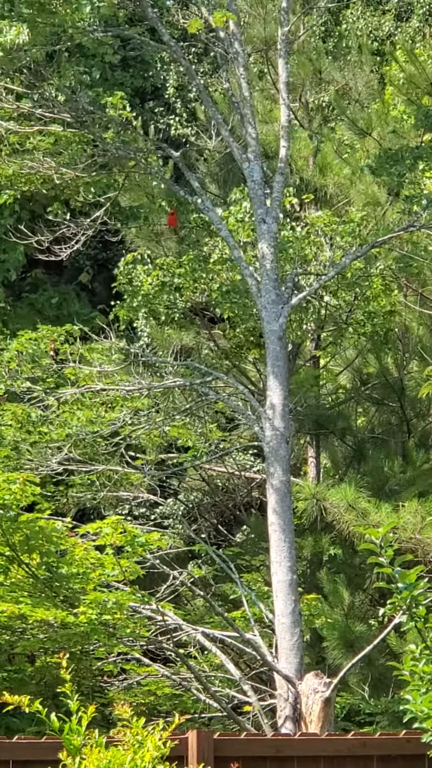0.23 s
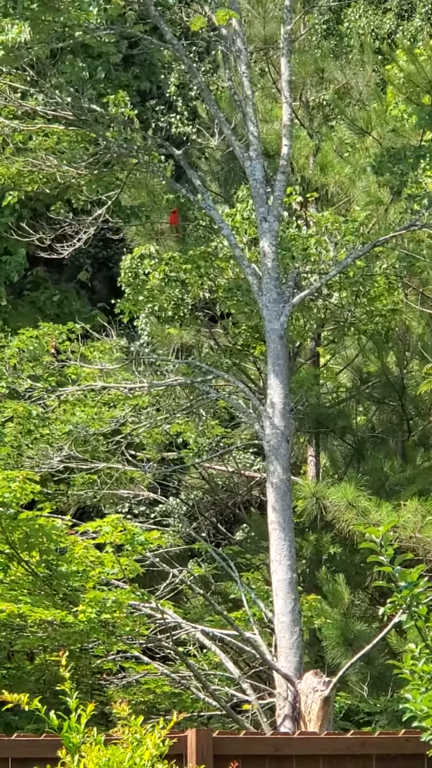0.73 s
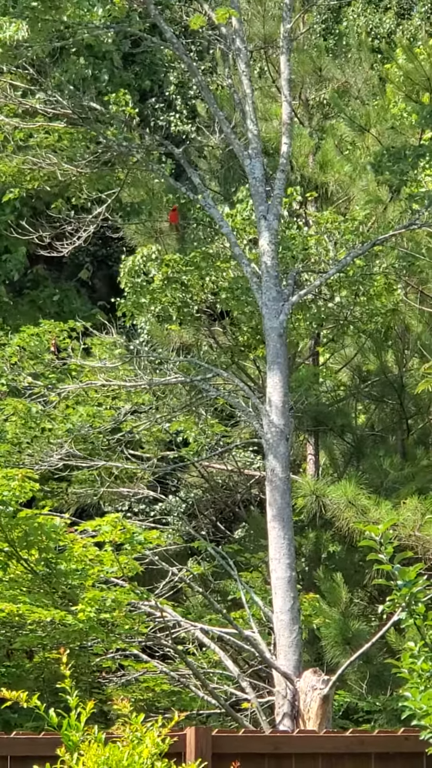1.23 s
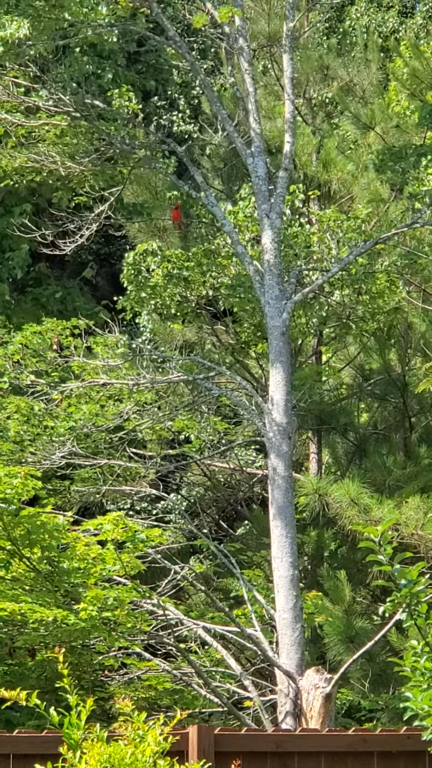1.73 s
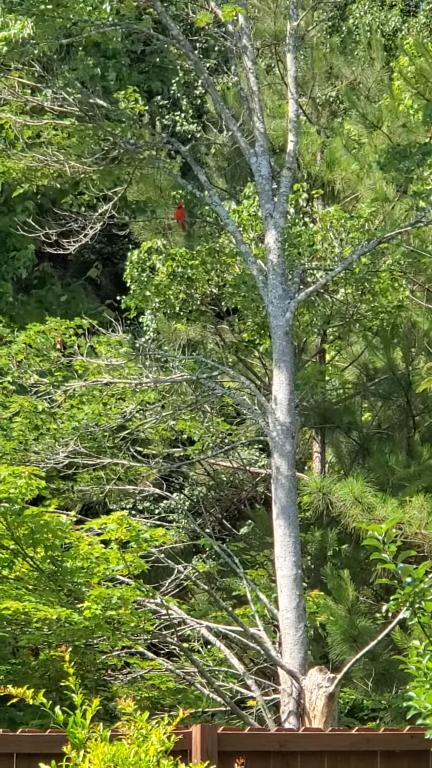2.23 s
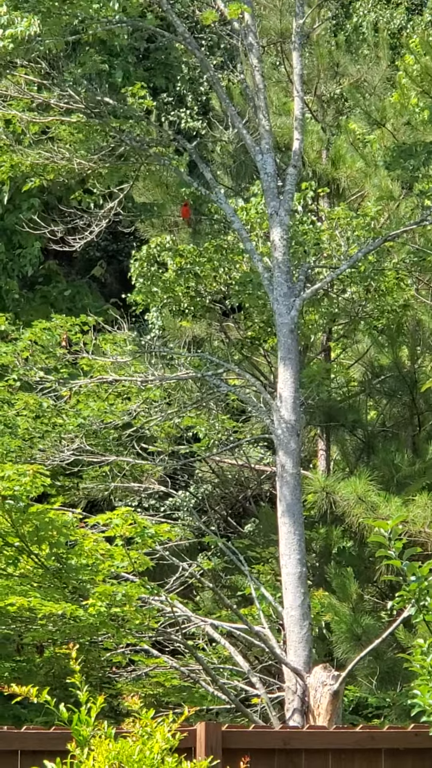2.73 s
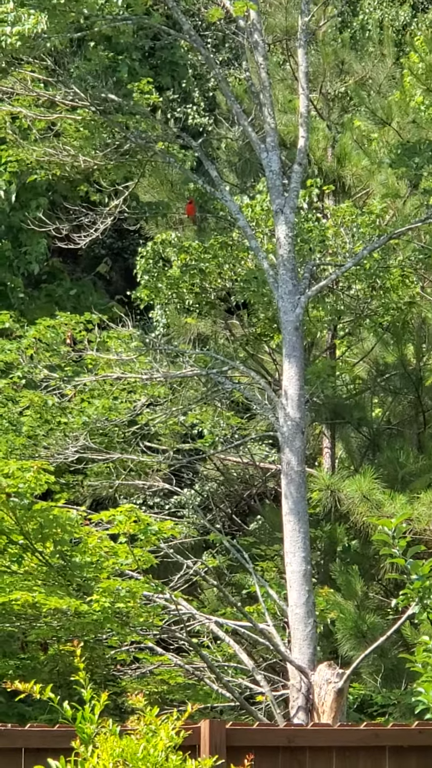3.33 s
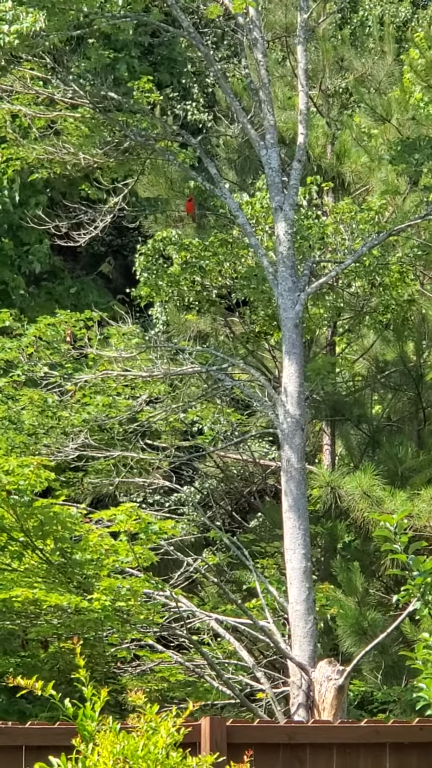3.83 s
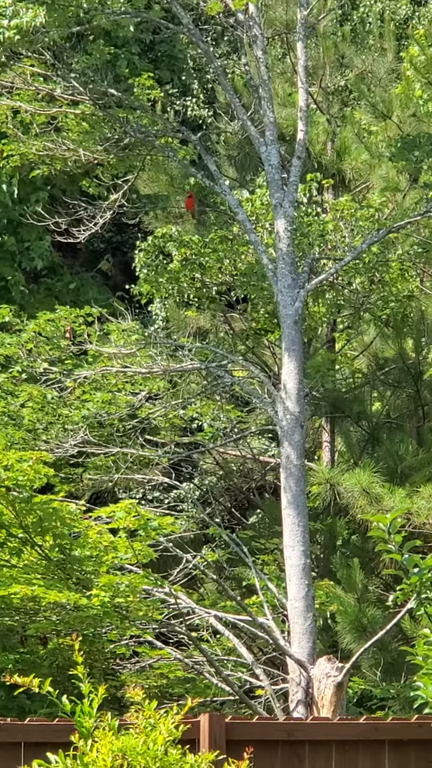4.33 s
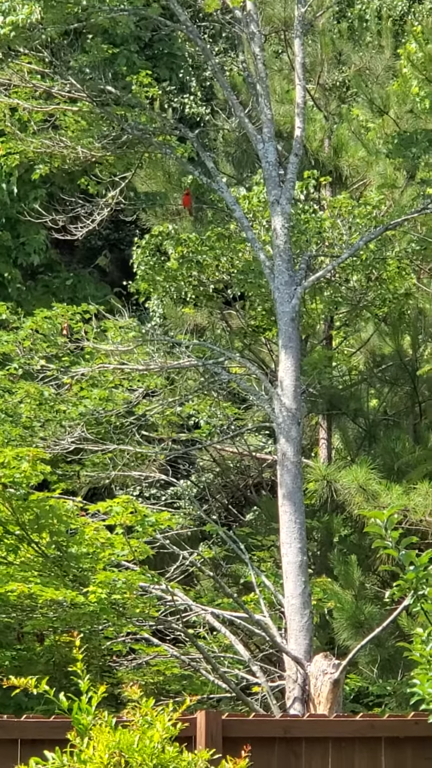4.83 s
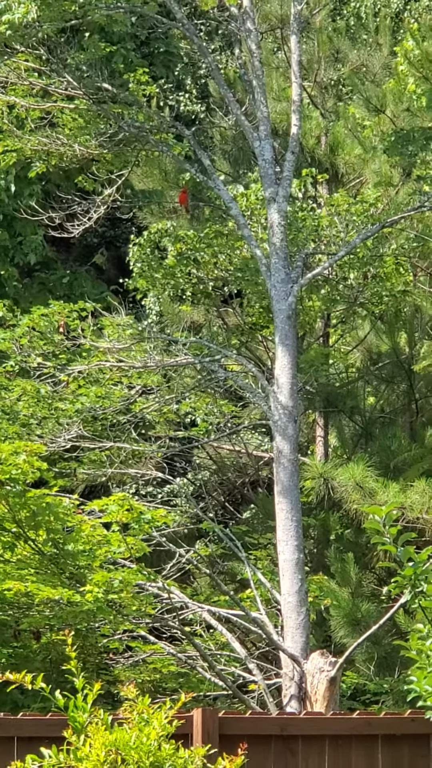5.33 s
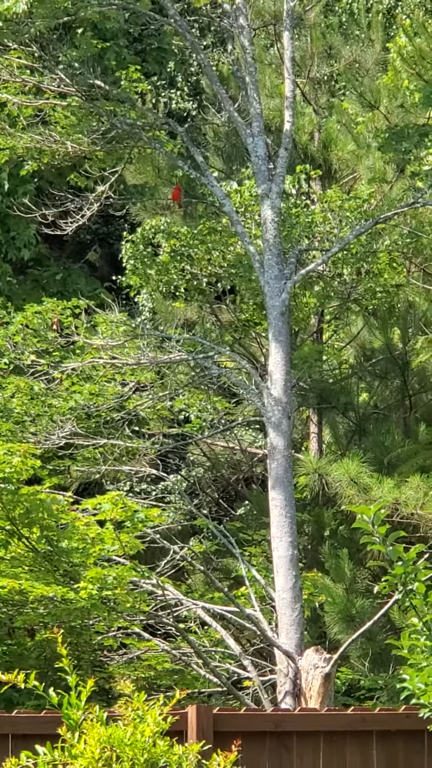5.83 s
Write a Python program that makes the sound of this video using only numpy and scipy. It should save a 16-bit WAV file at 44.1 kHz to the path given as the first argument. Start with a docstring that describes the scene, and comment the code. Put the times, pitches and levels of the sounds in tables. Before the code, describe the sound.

A quiet yard beside woods, heard through a phone: soft wide air and leaf hiss, a low wavering rumble that swells and dips, and a very faint distant machine hum with a thin fading whine. A cardinal starts immediately with a weak short note, then a longer falling whistle at 0.5 s and stronger ones at 0.9, 1.25 and 1.55 s. Each is a pure, liquid slur plunging from about 8 kHz, briefly easing, then sliding down to about 2 kHz. They come about every quarter second, loudest and brightest near 2.9 s. From 3.2 s they are clipped shorter, about five or six per second, the last softer at 4.3 s and over by 4.45 s. Close echoes and a short leafy tail surround every note, the bird slightly left. Rumble and hiss remain, with one tiny, faint falling chip at 5.5 s, until about 6 s.

```python
"""A low wavering rumble, a faint machine hum and open-air hiss come first; at once a cardinal sings over them.
Its slurred whistles fall from roughly 8 to 2 kHz and crowd together; one faint chip follows the song.
Each note is a swept sine: plunge to a shelf, drop as one side of the syrinx hands over to the other, slur down.
Noise-burst responses scatter the bird into near echoes, a leafy tail and a wall echo.
Beds: shaped noise for air, a wandering sine for the rumble, unsteady sines for the hum."""
import sys
import numpy as np
from scipy import signal
from scipy.fft import rfft, irfft, next_fast_len
from scipy.io import wavfile
from scipy.ndimage import uniform_filter1d

SR = 44100
rng = np.random.default_rng(int(sys.argv[2]) if len(sys.argv) > 2 else 0)


def bounce(signal):
    """Save signal as a 16-bit WAV file at the path given by the first command-line argument."""
    frames = np.transpose(np.atleast_2d(signal))
    limited = np.clip(frames, -1, 1)
    pcm = np.round(limited * 32767).astype(np.int16)
    wavfile.write(sys.argv[1], SR, pcm)


N = 267907
TIME = np.arange(N) / SR  # s


def undb(db):
    """Decibels to amplitude gain."""
    return 10 ** (np.asarray(db) / 20)


def unit(x):
    """Scale to rms 1."""
    return x / np.sqrt(np.mean(x ** 2))


def curve(table):
    """Second column of a table over TIME, joined by straight lines."""
    knots_s, values = np.transpose(table)
    return np.interp(TIME, knots_s, values)


def gain_at(points, hz):
    """Gain of a (frequency [Hz], level [dB]) spectrum, linear in dB over log frequency."""
    knots_hz, db = np.transpose(points)
    return undb(np.interp(np.log(np.maximum(hz, 1)), np.log(knots_hz), db))


def colour(x, points):
    """Zero-phase FFT filter by a (frequency [Hz], level [dB]) spectrum."""
    length = x.shape[-1]
    size = next_fast_len(length)
    gain = gain_at(points, np.fft.rfftfreq(size, 1 / SR))
    return irfft(rfft(x, size) * gain, size)[..., :length]


def walk(rate_hz):
    """Random levels held 1 / rate_hz, smoothed twice over the same time; rms 1."""
    hold = int(SR / rate_hz)
    held = np.repeat(rng.standard_normal(N // hold + 1), hold)
    smooth = uniform_filter1d(uniform_filter1d(held, hold), hold)
    return unit(smooth[:N])


def sine(hz):
    """Sine of rms 1 following a pitch curve: phase is the running sum of frequency."""
    return np.sqrt(2) * np.sin(2 * np.pi * np.cumsum(hz) / SR)


def bed(points, side_db):
    """Coloured stereo noise, rms 1; side_db sets left-right difference against the common part."""
    mid, side = colour(rng.standard_normal((2, N)), points)
    return unit(mid + undb(side_db) * side * np.array([[1], [-1]]))


# Open-air level before the band trims: (time [s], level [dB])
AIR_LEVEL = [(0, -54), (1.2, -52), (4.3, -51.5), (4.7, -53), (6.07, -53.5)]
# Tree hiss level: (time [s], level [dB])
HISS_LEVEL = [(0, -66.5), (2.5, -58.5), (5.2, -67.5), (6.07, -65.5)]
# Relative spectra of roar, middle band and hiss: (frequency [Hz], level [dB])
LOW_COLOUR = [(15, -35), (25, -43), (37, 1), (52, 0.5), (80, 5), (115, 2.5), (135, -8.5), (185, -5.5),
              (220, -21), (350, -63)]
MID_COLOUR = [(120, -3.5), (220, 0.5), (400, -1), (700, 0), (1100, -5.5), (1600, -16.5), (2500, -39.5),
              (5000, -48)]
HISS_COLOUR = [(800, -3.5), (2000, -2), (3200, -2.5), (5200, -3.5), (6600, -6.5), (8500, -14.5),
               (11000, -19), (15000, -23)]


def air(low_trim_db=2, mid_trim_db=-6, hiss_flicker_db=0.93):
    """Noise in three bands: distant roar nearly alike on both sides, middle, wide tree hiss."""
    air_db = curve(AIR_LEVEL)
    hiss_db = curve(HISS_LEVEL) + hiss_flicker_db * walk(11.0)
    low = bed(LOW_COLOUR, side_db=-21) * undb(air_db + low_trim_db)
    middle = bed(MID_COLOUR, side_db=-9.0) * undb(air_db + mid_trim_db)
    hiss = bed(HISS_COLOUR, side_db=1) * undb(hiss_db)
    return low + middle + hiss


# Rumble pitch before drift: (time [s], frequency [Hz])
RUMBLE_PITCH = [(0, 61.9), (.4, 68.04), (.9, 68.9), (1.7, 54.9), (2.4, 55), (3.1, 61.7), (3.4, 57.18),
                (6.07, 58.56)]
# Rumble level before trim and flutter: (time [s], level [dB])
RUMBLE_LEVEL = [(0.0, -74), (0.01, -59.5), (0.46, -41.5), (0.79, -46.5), (0.88, -60.5), (0.93, -48),
                (2.5, -46), (2.65, -55.5), (3.73, -40), (3.85, -53.5), (4.28, -40.5), (4.51, -46),
                (4.53, -58), (4.67, -38), (5.27, -60), (5.56, -45.5), (5.78, -58), (5.9, -50), (5.97, -65),
                (6.07, -52)]


def rumble(drift_hz=1.84, flutter_db=2.0, trim_db=-0.8):
    """Low drone: one sine that wanders in pitch and swells."""
    hz = curve(RUMBLE_PITCH) + drift_hz * walk(25)
    db = curve(RUMBLE_LEVEL) + trim_db + flutter_db * walk(20)
    return sine(hz) * undb(db)


# Steady machine lines: (frequency [Hz], level [dB])
HUM_LINES = [(119.5, -61), (170, -74.5), (240, -74.5)]
# Thin fading whine: (time [s], level [dB])
WHINE_LEVEL = [(0, -64.5), (1.1, -70.5), (1.5, -73), (6.07, -83)]
WHINE_HZ = 519


def hum(waver=0.00285, flicker_db=2):
    """Machine some gardens away: faint sines, each unsteady in pitch (waver is a share) and level."""
    total = np.zeros(N)
    for line_hz, line_db in [*HUM_LINES, (WHINE_HZ, curve(WHINE_LEVEL))]:
        level = undb(line_db + flicker_db * walk(4.1))
        total += level * sine(line_hz * (1 + waver * walk(8.6)))
    return total


KNEE_HZ = 4250  # lower side of the syrinx picks up the note here
HANDOVER_S = 0.016  # drop from shelf to knee
LINGER_S = 0.0094  # hold on the end pitch
STEP_AT, STEP_WIDTH = 0.46, 0.094  # slip within the slur, shares of its fall
STEP_S = 0.0066  # size of the slip, divided by the slur time


def slur(t, fall_s, rest_s, top_hz, shelf_hz, end_hz, bend, settle):
    """Pitch and handover progress: geometric glides top-shelf-knee-end, the last with a slip midway."""
    upper_s = fall_s - HANDOVER_S
    fallen = np.clip(t / upper_s, 0, 1) ** bend
    handed = np.clip((t - upper_s) / HANDOVER_S, 0, 1)
    slurred = 1 - np.clip(1 - (t - fall_s) / rest_s, 0, 1) ** settle
    step = np.tanh((slurred - STEP_AT) / STEP_WIDTH) + 1 - 2 * slurred
    slurred = slurred + STEP_S / rest_s * step
    hz = top_hz * (shelf_hz / top_hz) ** fallen
    hz = hz * (KNEE_HZ / shelf_hz) ** handed
    hz = hz * (end_hz / KNEE_HZ) ** slurred
    return hz, handed


# Slurred notes, levels before voice and path colour: (start [s], fall to knee [s], rest of slur [s],
# top pitch [Hz], shelf pitch [Hz], end pitch [Hz], bend of fall [exponent, <1 plunges, >1 hangs],
# settle of slur [exponent, >1 flattens out], level [dB], tilt [dB/octave], handover dip [dB, <0 lifts])
SONG = [ (.024, .054, .040, 6550, 5720, 2260, 2, 0.72, -54.5, -10.5, 27),
        (.479, 0.16, 0.12, 6400, 4850, 2400, 0.84, 1.15, -44.5, -6, -4.5),
        (.902, 0.12, 0.13, 7270, 4800, 2245, 0.57, 1.2, -39.5, -1.5, -1.5),
        (1.258, 0.082, 0.13, 8420, 5050, 2153, 0.51, 1.14, -39, -4, -3.5),
        (1.566, 0.069, 0.12, 8720, 5100, 2120, 0.75, 0.95, -36, -3, -3),
        (1.857, 0.066, 0.12, 8530, 4950, 2020, 0.6, 0.89, -34.5, -2, -1),
        (2.134, 0.062, 0.12, 8380, 5050, 2040, 0.64, 0.98, -33.5, -0.5, -2),
        (2.401, 0.062, 0.12, 8470, 5100, 1980, 0.62, 1.01, -33, 0.5, 3),
        (2.665, 0.055, 0.12, 8420, 5200, 1910, .68, 0.86, -33, 0.5, 5),
        (2.918, .055, 0.12, 8635, 5350, 1910, 0.61, 0.95, -32, 2.5, -0.5),
        (3.175, .053, 0.071, 9070, 5400, 1800, 0.59, 1.32, -33.5, 2.3, 4),
        (3.372, 0.051, 0.059, 8960, 5500, 1770, 0.62, 1.26, -34.5, 1, 3),
        (3.556, 0.046, .060, 7155, 5600, 1730, 1.18, 1.33, -34, 0.5, 0),
        (3.738, 0.05, .057, 8680, 5450, 1760, 0.55, 1.28, -34, 1, -0.5),
        (3.918, 0.051, 0.06, 8760, 5550, 1762, 0.59, 1.2, -35, 0, 4),
        (4.103, 0.047, 0.056, 8100, 5650, 1780, 0.74, 1.01, -35.5, -0.5, 6.5),
        (4.301, 0.044, 0.058, 8190, 5600, 1885, 0.85, 1.22, -40, -0.5, 5), ]
# Chip after the song: (start [s], length [s], top pitch [Hz], end pitch [Hz], level [dB])
CHIPS = [(5.511, 0.0406, 5760, 4600, -66)]


def notes():
    """Yield each note's sample mask, pitch [Hz], level [dB] and level course [dB]."""
    for start_s, fall_s, rest_s, top_hz, shelf_hz, end_hz, bend, settle, db, tilt_db, dip_db in SONG:
        end_s = start_s + fall_s + rest_s + LINGER_S
        span = (TIME >= start_s) & (TIME < end_s)
        hz, handed = slur(TIME[span] - start_s, fall_s, rest_s, top_hz, shelf_hz, end_hz, bend, settle)
        course_db = tilt_db * np.log2(hz / KNEE_HZ) - dip_db * np.sin(np.pi * handed)
        yield span, hz, db, course_db
    for start_s, length_s, top_hz, end_hz, db in CHIPS:
        span = (TIME >= start_s) & (TIME < start_s + length_s)
        yield span, np.geomspace(top_hz, end_hz, span.sum()), db, 0


# Voice strength over its range: (frequency [Hz], level [dB])
VOICE = [(1750, -11), (2000, -7.5), (2200, -4.5), (2600, -4), (3500, -0.5), (4250, 4), (5000, 0), (5700, 1),
         (6350, 0.65), (7000, -13), (8700, -8.5)]
# Overtone strength by overtone frequency, before the shares below: (frequency [Hz], level [dB])
OVERTONES = [(4000, -32), (7500, -25.5), (9500, -22.5), (10500, -21.5), (11400, -13.5), (12300, -15),
             (13200, -9), (14500, -2), (15500, -24)]
ATTACK_S, RELEASE_S = 0.011, 0.028


def cardinal(waver=0.0025, wander=0.0047, flicker_db=0.68, overtone_flicker_db=1, switch_hz=3700,
             low_side_db=-7, upper_db=-14, full_voice_db=-35, brighten=0.24):
    """Syrinx: a sliding sine plus harmonics 2-5; the lower side, heard below switch_hz, is richer."""
    whistle, overtones = np.zeros((2, N))
    tremble = 1 + waver * walk(160) + wander * walk(50)
    unsteady_db = flicker_db * walk(60)
    for span, pitch_hz, db, course_db in notes():
        hz = pitch_hz * tremble[span]
        t = np.arange(len(hz)) / SR
        phase = 2 * np.pi * np.cumsum(hz) / SR
        gate = np.clip(np.minimum(t / ATTACK_S, (t[-1] - t) / RELEASE_S), 0, 1)
        level = undb(db + course_db + unsteady_db[span])
        strength = np.sqrt(2) * gate * gain_at(VOICE, hz) * level
        whistle[span] += strength * np.sin(phase)
        low_side = undb(low_side_db) * np.clip((switch_hz - hz) / 500, 0, 1)
        upper = low_side * undb(upper_db)
        richness = undb(brighten * (db - full_voice_db))  # a harder-driven note is brighter
        for k, share in enumerate([1, low_side, upper, upper], 2):
            overtone = gain_at(OVERTONES, k * hz) * np.sin(k * phase)
            overtones[span] += strength * richness * share * overtone
    return whistle, overtones * undb(overtone_flicker_db * walk(70))


def scatter(delay_s, decay_s, db):
    """Dying noise burst of reflections, unrelated left and right, set energy per side."""
    age = TIME[:SR] - delay_s
    envelope = (age >= 0) * np.exp(-np.maximum(age, 0) / decay_s)
    burst = rng.standard_normal((2, SR)) * envelope
    return undb(db) * burst / np.sqrt(np.sum(burst ** 2, axis=1, keepdims=True))


def travel(x, response):
    """Convolve with a stereo response scaled to unit mean energy per side."""
    response = response / np.sqrt(np.sum(response ** 2) / 2)
    return signal.fftconvolve(x[None], response, axes=1)[:, :N]


# Near echoes off ground, trunks and fence: (delay [s], relative level [dB], smear [s])
ECHOES = [(.0022, -0.5, 0.0017), (.011, 0.5, 0.00074), (0.0155, -46, .002), (0.029, -7.5, 0.00089)]
# Leafy tail colour: (frequency [Hz], level [dB])
LEAVES = [(1800, 9.5), (4000, 2.5), (6500, 0), (13000, 0)]
# House-wall echo colour: (frequency [Hz], level [dB])
WALL = [(2000, -15), (3000, 5.5), (4300, 6), (5000, -3.5), (7000, -18)]
# Bird-to-microphone colour, whistle only: (frequency [Hz], level [dB])
PATH = [(2250, -1), (2500, -1), (2780, 3.5), (3050, 1.5), (3430, 5), (3750, 1.5), (4200, 1.5), (5000, 2),
        (5550, 1.5), (5950, 3), (6500, 3), (7100, 9)]


def woods(whistle, overtones, direct_db=2, near_db=0, near_t60_s=0.19, far_db=-2.5, far_t60_s=0.54,
          deep_db=-23, deep_t60_s=2.13, wall_s=0.102, wall_smear_s=0.0004, wall_db=-9, beam_db=-9):
    """Direct path, smeared echoes, wall, and scatter from near leaves, far trunks and deep wood."""
    tails = [(near_t60_s, near_db), (far_t60_s, far_db), (deep_t60_s, deep_db)]
    tail = sum(scatter(0.0037, t60_s / np.log(1000), db) for t60_s, db in tails)
    diffuse = colour(tail, LEAVES)
    diffuse += colour(scatter(wall_s, wall_smear_s, wall_db), WALL)
    early = sum(scatter(delay_s, smear_s, db) for delay_s, db, smear_s in ECHOES)
    # bird slightly left: direct path reaches the right 2 samples later
    early[0, 0] += undb(direct_db)
    early[1, 2] += undb(direct_db)
    whistle_out = travel(colour(whistle, PATH), early + diffuse)
    # the beak beams overtones into the trees: mostly scatter arrives
    overtones_out = travel(overtones, undb(beam_db) * early + diffuse)
    return whistle_out + overtones_out


def scene():
    """Background beds plus the bird in the wood."""
    return air() + rumble() + hum() + woods(*cardinal())


def record(dry):
    """The phone cuts the top: steep elliptic low-pass at 15.7 kHz, 0.2 dB ripple, 80 dB stop."""
    top_hz = 15700
    sections = signal.ellip(10, 0.2, 80, top_hz, fs=SR, output="sos")
    return signal.sosfilt(sections, dry)


dry = scene()
out = record(dry)
bounce(out)
```